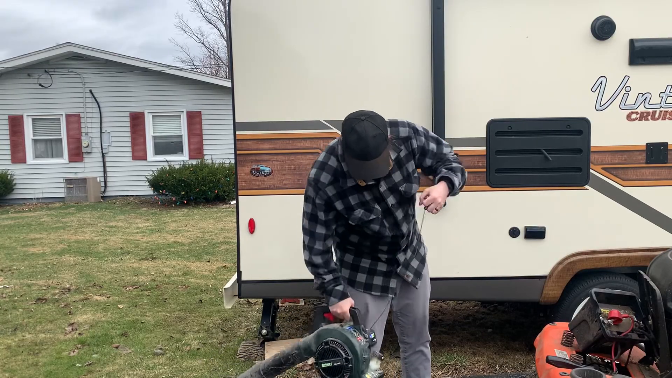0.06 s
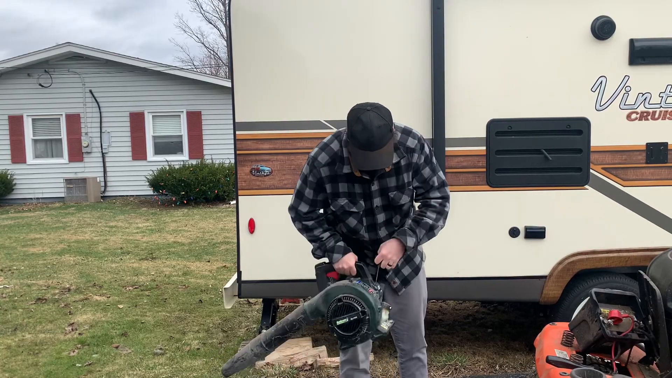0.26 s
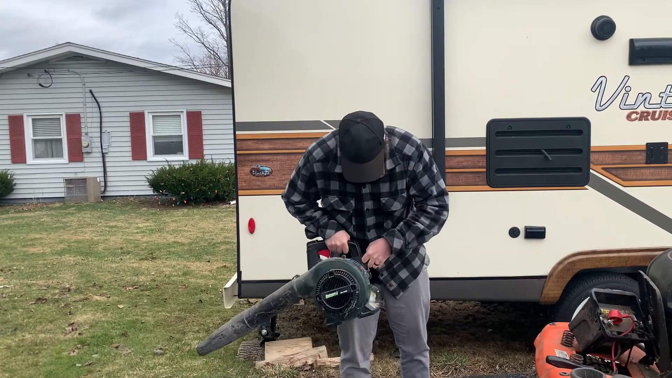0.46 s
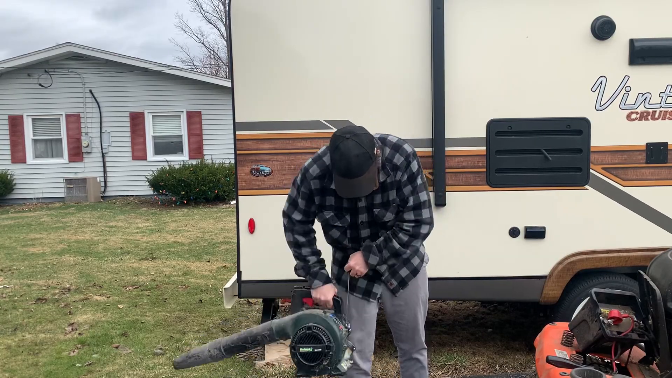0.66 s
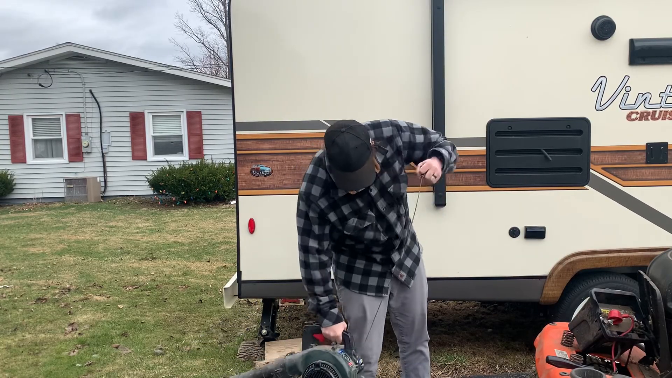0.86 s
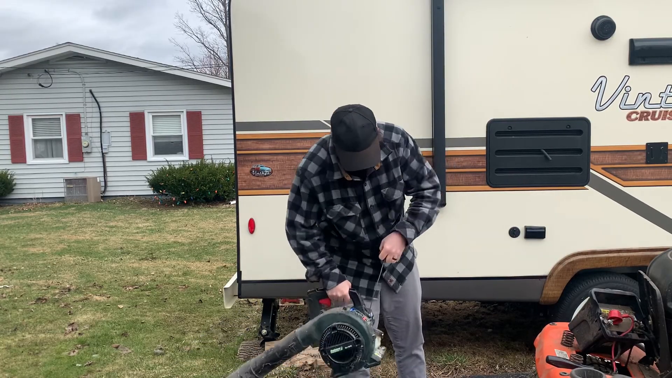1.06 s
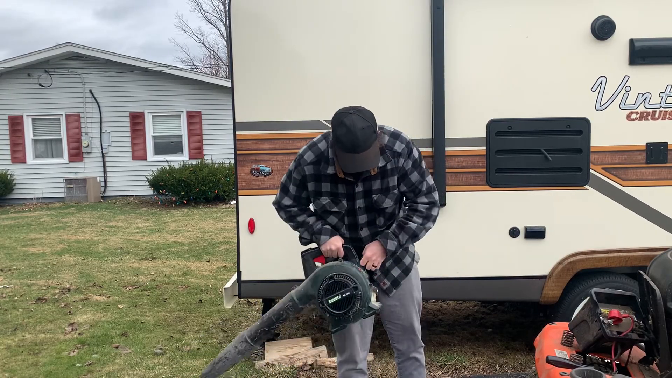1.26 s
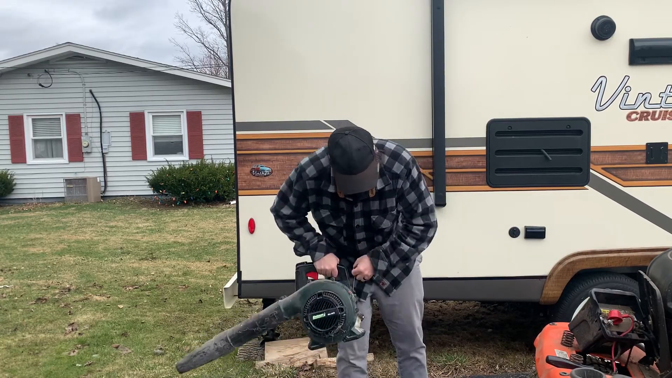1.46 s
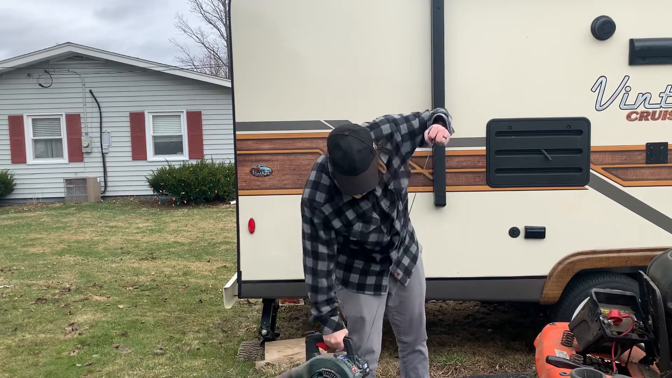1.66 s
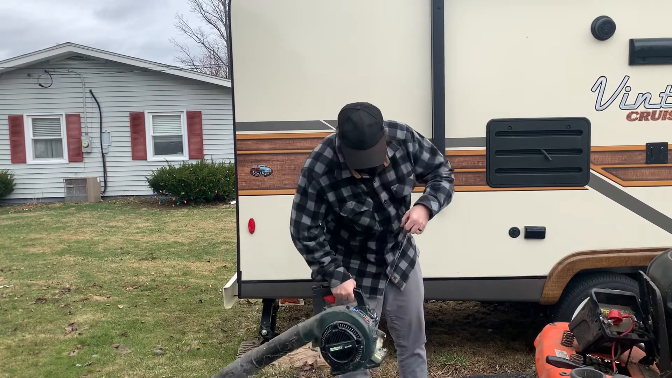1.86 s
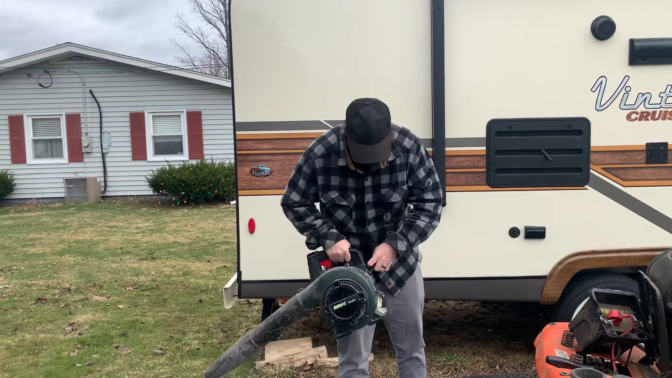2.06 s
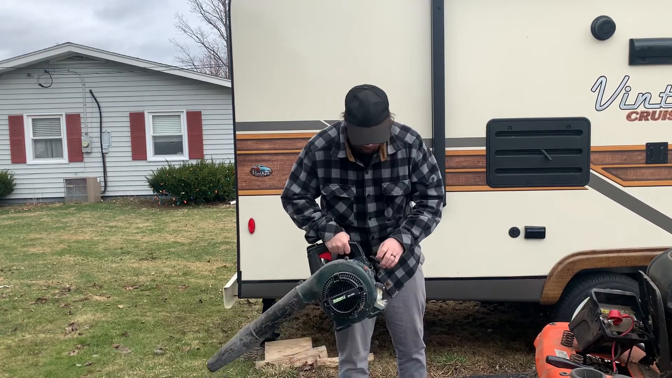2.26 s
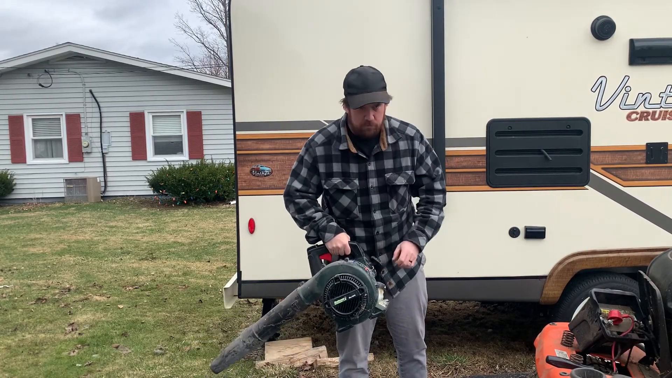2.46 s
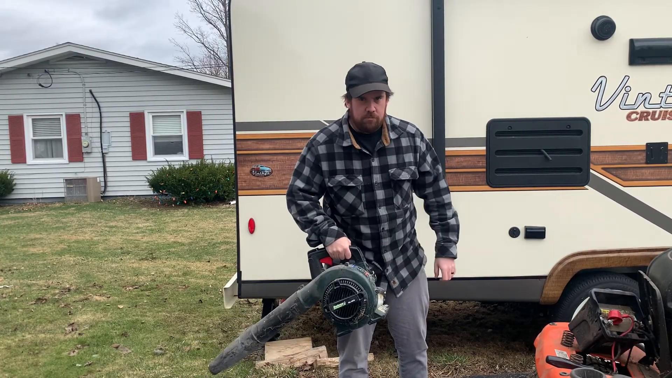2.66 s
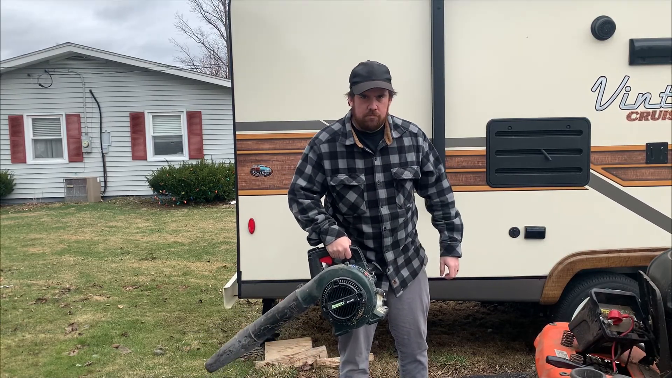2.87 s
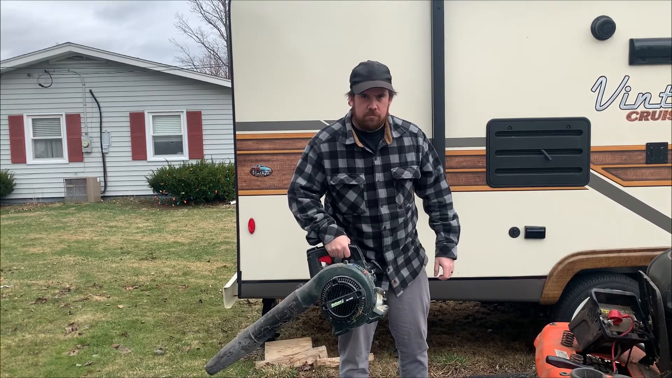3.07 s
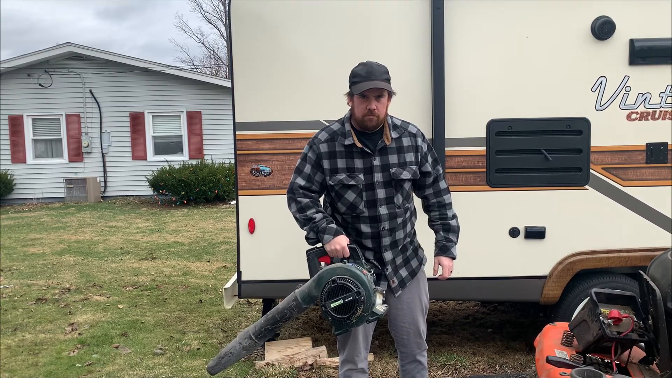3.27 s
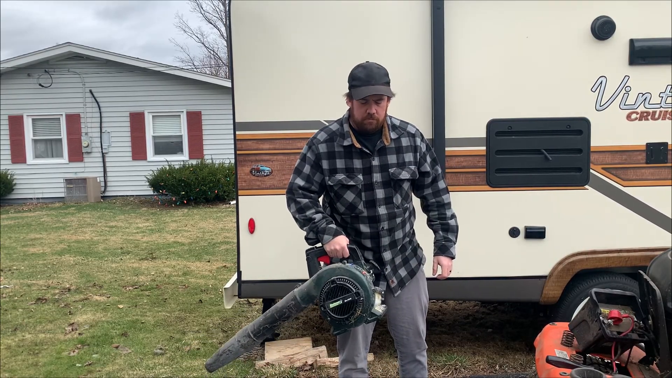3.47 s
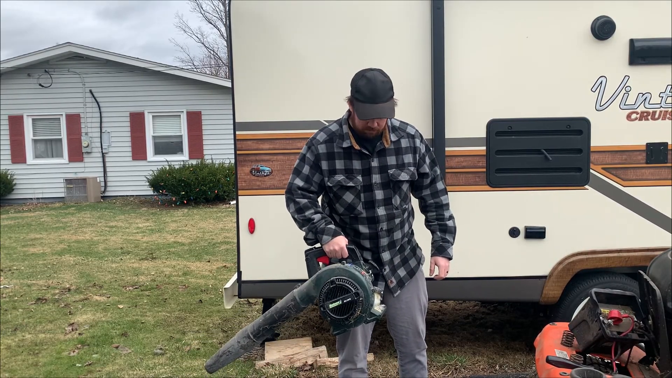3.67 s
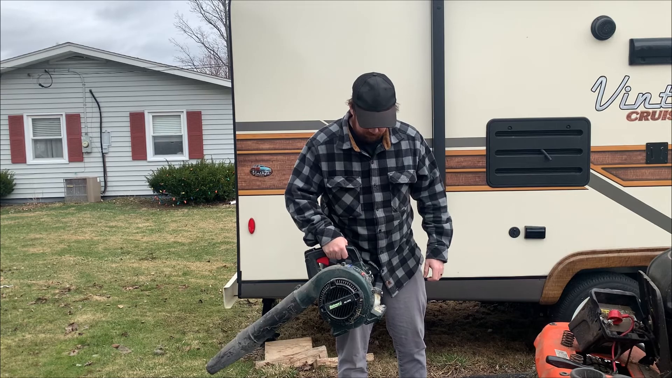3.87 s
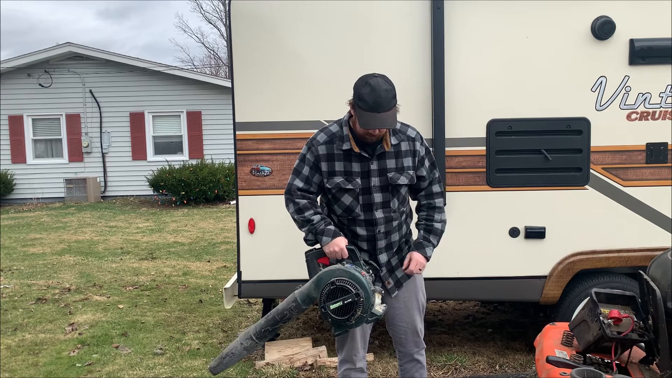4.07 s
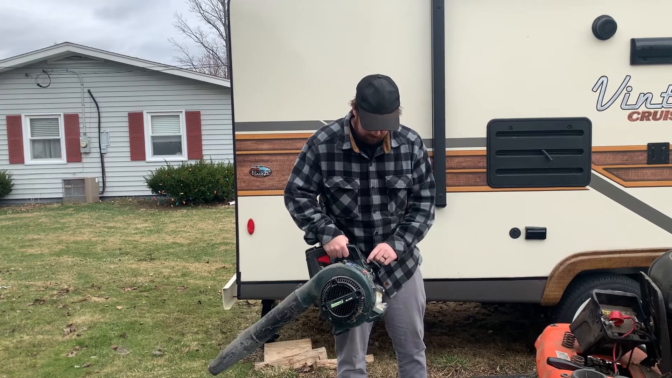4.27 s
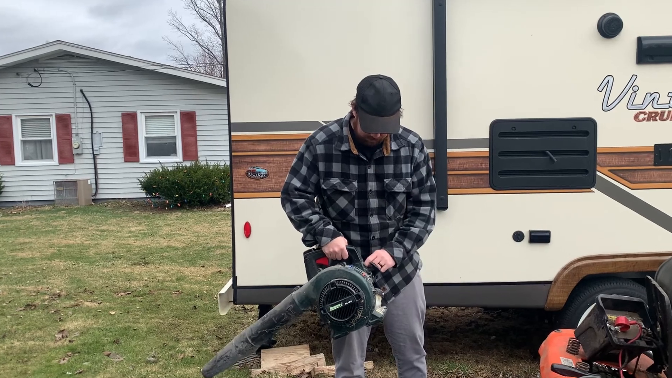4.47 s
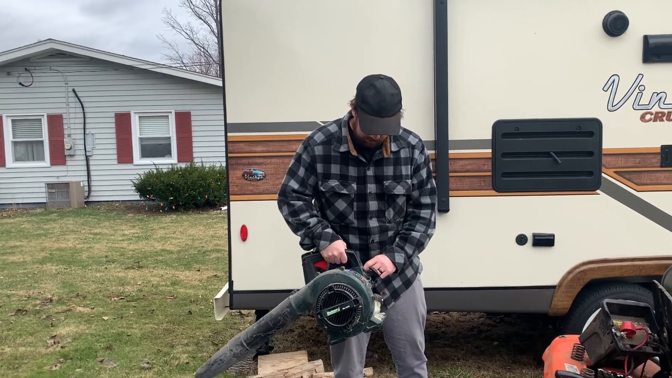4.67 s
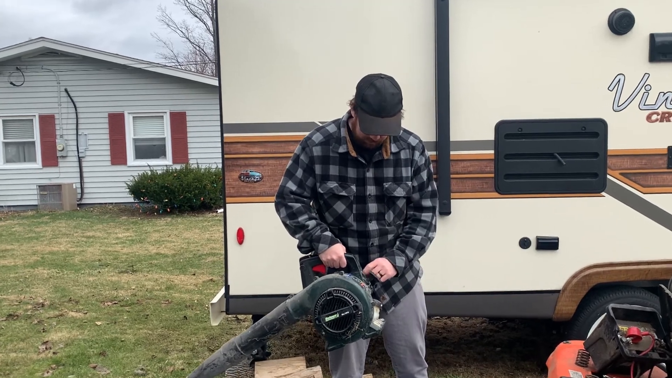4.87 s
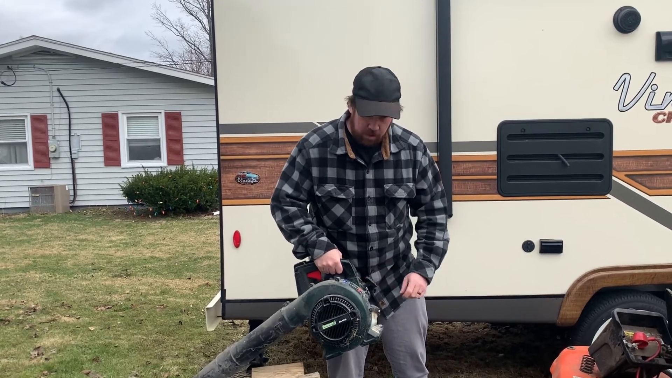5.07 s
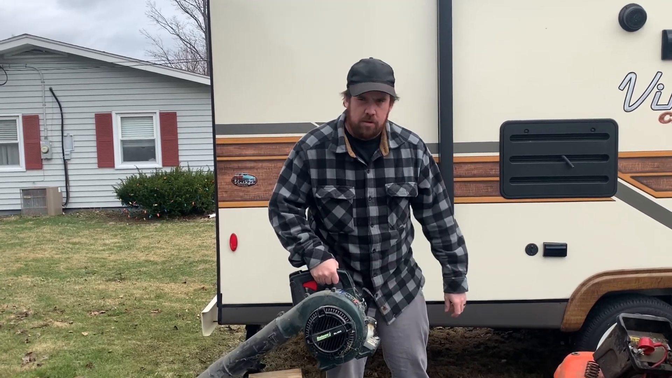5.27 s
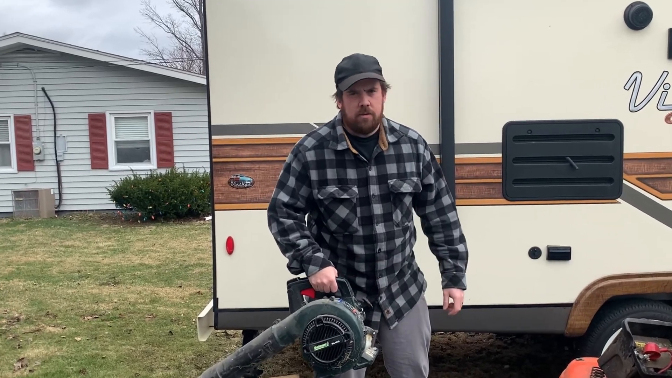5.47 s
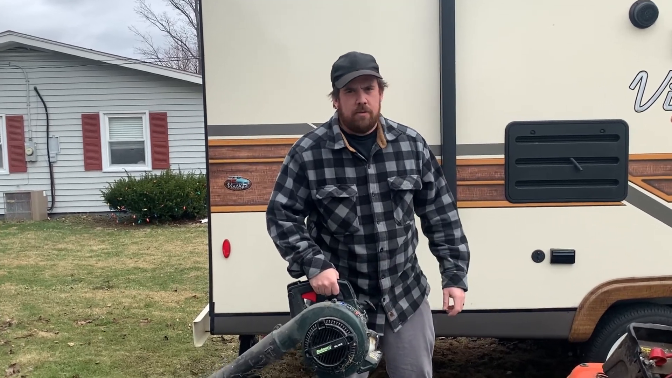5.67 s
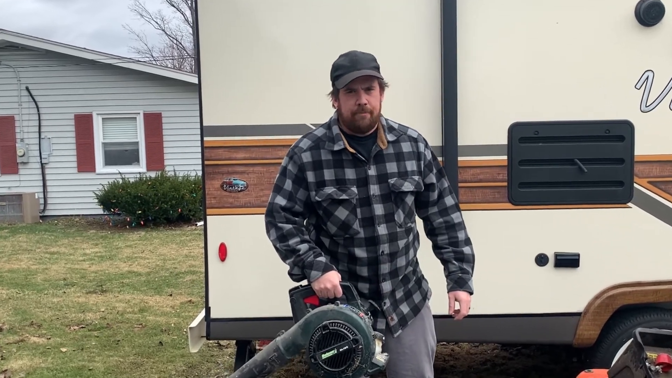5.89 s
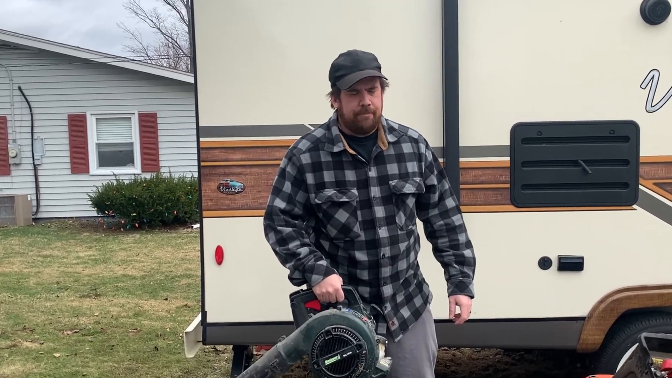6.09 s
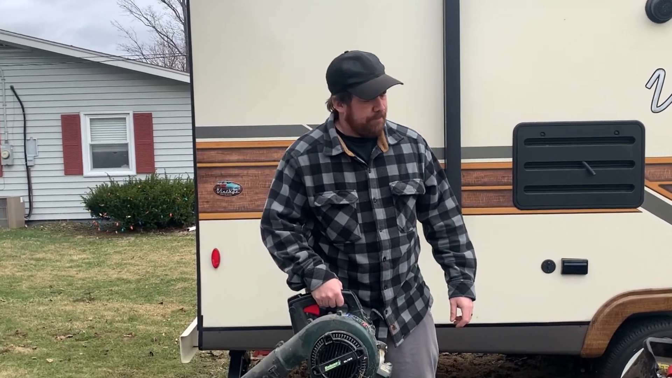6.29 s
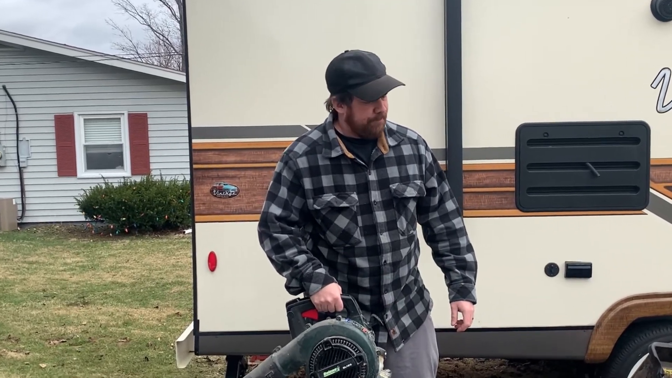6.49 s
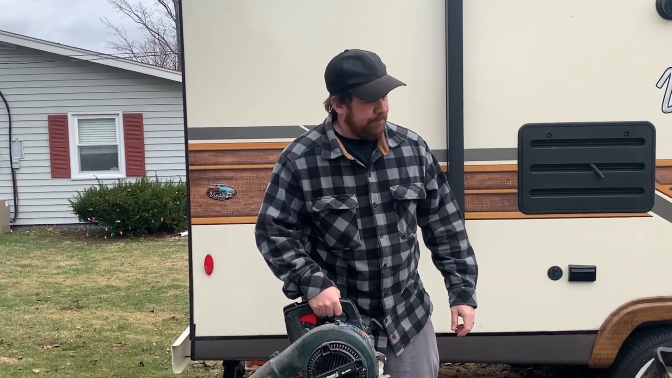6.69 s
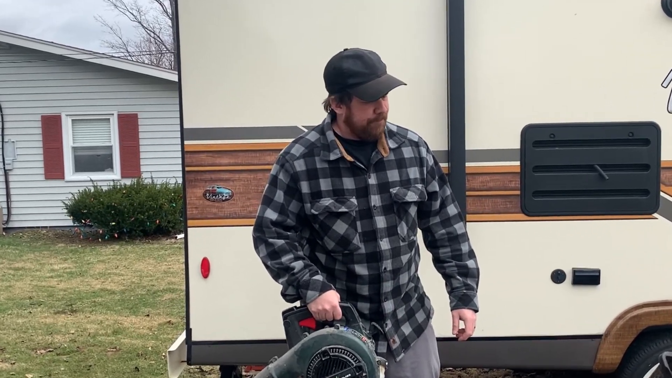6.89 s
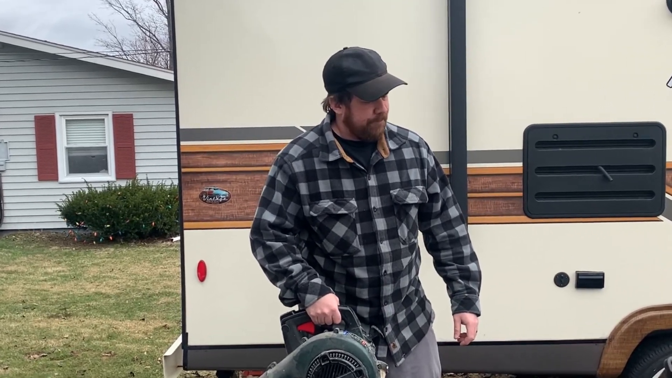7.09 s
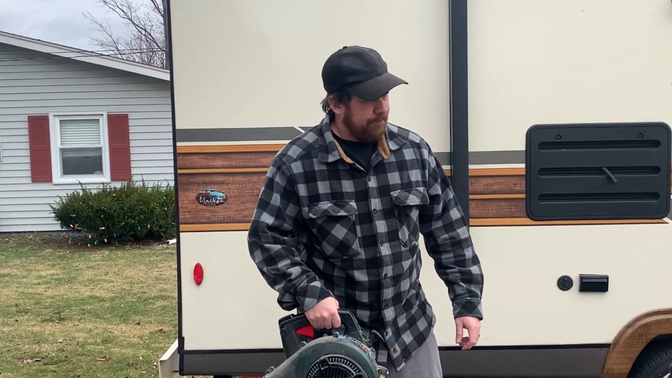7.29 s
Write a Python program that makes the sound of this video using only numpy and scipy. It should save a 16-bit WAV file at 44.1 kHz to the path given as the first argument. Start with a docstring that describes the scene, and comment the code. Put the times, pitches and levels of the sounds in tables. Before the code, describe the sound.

Two short starter-cord pulls clatter and rewind, a third fires a small petrol blower that idles lumpily, nearly stalls, then runs steadily.

```python
"""A hand-held two-stroke leaf blower is pull-started on a lawn beside a camper.
Twice the cord turns the engine over and whirs back onto its reel, with clacks of the starter and handle.
On the third pull the engine catches and idles lumpily, firing only every few turns.
It sags almost to a stall, where loose parts buzz, and then picks up to a steady beat.
Every turn puffs gas into the ringing muffler; filtered noise makes the clatter, rattles and faint yard air."""
import sys
import numpy as np
from scipy import signal
from scipy.fft import rfft, irfft, next_fast_len
from scipy.io import wavfile
from scipy.ndimage import uniform_filter1d, map_coordinates

SR = 44100
rng = np.random.default_rng(int(sys.argv[2]) if len(sys.argv) > 2 else 0)


def bounce(signal):
    """Save signal as a 16-bit WAV file at the path given by the first command-line argument."""
    frames = np.transpose(np.atleast_2d(signal))
    limited = np.clip(frames, -1, 1)
    pcm = np.round(limited * 32767).astype(np.int16)
    wavfile.write(sys.argv[1], SR, pcm)


N = 323694
TIME = np.arange(N) / SR
SIZE = 2 * next_fast_len(N // 2 + SR // 4)  # room for filter tails
FREQ = np.maximum(np.arange(SIZE // 2 + 1) * SR / SIZE, 1)

# average crank speed once the engine runs: (time [s], speed [turns per second])
CRANK_SPEED = [(1.8, 37), (2.9, 38), (3.2, 29), (3.9, 30), (4.3, 24), (4.8, 24), (5.0, 35), (5.238, 44.54),
               (5.7, 53.07), (6.3, 56.19), (6.85, 58.49), (7.3, 55.68)]
# irregular firings of the cold engine: (time [s], strength [dB])
COLD_FIRINGS = [(1.773, -23), (1.822, -46), (1.879, -21.5), (2.001, -21), (2.116, -19), (2.23, -19.5),
                (2.344, -20), (2.439, -21.5), (2.561, -25), (2.688, -24), (2.822, -20.5), (2.954, -22),
                (3.068, -26), (3.16, -37), (3.232, -30), (3.341, -23.5), (3.484, -24), (3.653, -22),
                (3.82, -22), (3.976, -24.5), (4.087, -40), (4.165, -24), (4.284, -23.5), (4.372, -25.5),
                (4.441, -44), (4.532, -24.5), (4.644, -32), (4.766, -31), (4.855, -26), (4.951, -20.5),
                (5.033, -21), (5.14, -21.5)]
# the piston passing compression without firing: (time [s], level [dB])
COMPRESSIONS = [(0.0, -26), (0.033, -23), (0.066, -25), (0.104, -26), (0.146, -27), (0.197, -32),
                (0.267, -31), (0.792, -22.5), (0.83, -23), (0.863, -25), (0.894, -27), (0.928, -22.5),
                (0.966, -26), (1.015, -27), (1.069, -29), (1.155, -28), (1.619, -23), (1.658, -27),
                (1.687, -24), (1.713, -23.5), (1.746, -30)]
# resonances of the cord reel: (frequency [Hz], width [Hz], relative level [dB])
REEL_RESONANCES = [(1360, 220, 4), (2070, 37, 13), (3780, 90, 6), (6160, 620, 0), (10030, 46, 7.5),
                   (12800, 2500, -3)]
# tone colour of rattling parts: (frequency [Hz], relative level [dB])
RATTLE_COLOUR = [(1200, 5), (2500, 4.5), (4000, 1.5), (8000, 4), (10000, 4), (14600, -2), (16000, -9)]

STEADY_DB = -22  # strength of the first firing of the steady beat
CATCH_S = 0.34  # time the muffler takes to fill as the engine catches
ROUNDING_S = 0.0072  # smoothing time that softens the start of a swell


def amp(db):
    """Turn decibels into a gain."""
    return 10 ** (np.asarray(db) / 20)


def unit(x):
    """Scale to an rms of one."""
    return x / np.sqrt(np.mean(np.abs(x) ** 2))


def across(points):
    """Join (Hz, value) points by straight lines over log frequency."""
    hz, value = np.transpose(points)
    return np.interp(np.log(FREQ), np.log(hz), value)


def through(x, response):
    """Filter a sound by a frequency response."""
    return irfft(rfft(x, SIZE) * response, SIZE)[..., :N]


def colour(points):
    """Make a unit-energy filter with the given (Hz, dB) outline that never sounds ahead of its input."""
    cepstrum = irfft(np.log(amp(across(points))))
    return unit(np.exp(rfft(2 * cepstrum[:SIZE // 2], SIZE)))


def modes(rows):
    """Add up resonances into one filter of unit energy."""
    return unit(sum(amp(db) / (1 + 1j * (FREQ ** 2 - hz ** 2) / (FREQ * width))
                    for hz, width, db in rows))


def taps(times, sizes):
    """Place single-sample impulses at the given times."""
    index = np.round(np.asarray(times) * SR).astype(int)
    return np.bincount(np.maximum(index, 0), sizes * np.ones(len(index)), N)[:N]


def bursts(times, sizes, fade_s, rise_s):
    """Make an envelope that swells and dies away after each time."""
    t = TIME[:SR // 4]
    shape = np.exp(-t / fade_s) * (1 - np.exp(-t / rise_s))
    return signal.fftconvolve(taps(times, sizes), shape / shape.max())[:N]


def gate(times, start, end, attack_s, fall_db_s):
    """Make an envelope that is fully up by the start, holds to the end and then decays."""
    return np.clip(1 + (times - start) / attack_s, 0, 1) * amp(-fall_db_s * np.maximum(times - end, 0))


def noise():
    """Make white noise."""
    return rng.standard_normal(N)


def grit():
    """Make noise like dense tiny contacts, its strength changing every 32 samples."""
    strength_db = 3 * np.repeat(rng.standard_normal(N // 32 + 1), 32)[:N]
    return unit(noise() * amp(strength_db))


def drift(rate):
    """Make a smooth random curve of unit rms that takes new values at the given rate in Hz."""
    k = int(SR / rate)
    steps = np.repeat(rng.standard_normal(N // k + 1), k)
    return unit(uniform_filter1d(steps, k)[:N])


def rings(times, sizes, top_hz, end_hz, glide_s, peak_s):
    """After each time a tone swells, glides from its top pitch toward its end pitch and dies away."""
    out, t = np.zeros(N + SR), TIME[:SR // 8]
    for start, size, top, end, peak in np.broadcast(times, sizes, top_hz, end_hz, peak_s):
        phase = np.cumsum(end + (top - end) * np.exp(-t / glide_s)) / SR
        envelope = (t / peak * np.exp(1 - t / peak)) ** 2
        i = int(np.clip(start * SR, 0, N))
        out[i:i + len(t)] += size * np.sin(2 * np.pi * phase) * envelope
    return out[:N]


def knocks(times, sizes, pitches, rows, scatter_db, fade_s, rise_s):
    """Each short gritty blow rings its own mix of the resonances, scaled by its pitch."""
    out, t = np.zeros(N + SR), TIME[:SR // 10]
    freq = np.maximum(np.fft.rfftfreq(len(t), 1 / SR), 1)
    shape = np.exp(-t / fade_s) * (1 - np.exp(-t / rise_s))
    shape = shape / shape.max()
    for start, size, pitch in np.broadcast(times, sizes, pitches):
        ring = 0
        for hz, width, db in rows:
            level = amp(db + scatter_db * rng.standard_normal())
            ring = ring + level / (1 + 1j * (freq ** 2 - (hz * pitch) ** 2) / (freq * width))
        blow = rng.standard_normal(len(t)) * shape
        i = int(np.clip(start * SR, 0, N))
        out[i:i + len(t)] += size * irfft(rfft(blow) * unit(ring), len(t))
    return out[:N]


def speed(times):
    """Give the crank turns per second at the given times."""
    return np.interp(times, *np.transpose(CRANK_SPEED))


def opened(times):
    """Give the share of full flow through the muffler: none at a slow idle, all at full speed."""
    idle, full = CRANK_SPEED[1][1], CRANK_SPEED[-1][1]
    return np.clip((speed(times) - idle) / (full - idle), 0, 1)


def firings():
    """Time and strength of every firing: irregular while cold, then on every third or fourth turn."""
    # the steady beat: (number of firings [count], turns leading up to each [turns], strength [dB])
    beat_pattern = [(24, 4, -18.5), (1, 3, -18.5), (1, 4, -23), (2, 3, -18.5), (1, 4, -23)]
    steady_from_s = 5.238
    cold_s, cold_db = np.transpose(COLD_FIRINGS)
    turns = np.cumsum(speed(TIME)) / SR
    repeats, apart, beat_db = np.transpose(beat_pattern)
    repeats = repeats.astype(int)
    due = np.interp(steady_from_s, TIME, turns) + np.append(0, np.cumsum(np.repeat(apart, repeats)))
    times = np.append(cold_s, np.interp(due, turns, TIME))
    return times, np.concatenate([cold_db, [STEADY_DB], np.repeat(beat_db, repeats)])


def crank():
    """Time and length of every turn; between two firings the crank coasts through whole turns."""
    coast_sag = 0.063  # the crank is about this share faster after a firing, and slower before the next
    unfired, fired = np.transpose(COMPRESSIONS)[0], firings()[0]
    unfired_length = np.clip(np.diff(unfired, append=fired[0]), 0.03, 0.065)
    rows = list(zip(unfired, unfired_length))
    gaps = np.append(np.diff(fired), fired[-1] - fired[-2])
    for start, gap in zip(fired, gaps):
        n = round(gap * speed(start + gap / 2))
        rows += [(start + gap * u * (1 - coast_sag * (1 - u)), gap / n) for u in np.arange(n) / n]
    return np.transpose(rows)


def effort(times):
    """Gains of muffler and clatter: up as the engine turns over, down as it stops, held once it runs."""
    # the engine turning over before it runs, under the cord or coasting:
    # (first compression [s], last compression [s], muffler level [dB])
    turning_over = [(0.002, 0.176, -27.5), (0.184, 0.29, -38), (0.77, 1.008, -28.5), (1.582, 1.76, -28)]
    spin_up_s, muffler_fall_db_s, clatter_fall_db_s = 0.1, 26, 92
    muffler_slope_db, clatter_slope_db = 7, -0.5  # gained per tenfold speed
    surge_db, settle_s = 17, 0.15  # the muffler overshoots as the engine catches, then settles
    since = np.maximum(times - COLD_FIRINGS[0][0], 0)
    running = np.clip(since / CATCH_S, 0, 1) ** 1.4
    pace = np.log10(speed(times) / CRANK_SPEED[0][1])
    muffler = running * amp(-20.5 + muffler_slope_db * pace + surge_db * np.exp(-since / settle_s))
    clatter = (since > 0) * amp(-37.5 + clatter_slope_db * pace)
    for first, last, db in turning_over:
        early_muffler = amp(db) * gate(times, first, last, spin_up_s, muffler_fall_db_s)
        early_clatter = amp(-36) * gate(times, first, last, spin_up_s, clatter_fall_db_s)
        muffler = np.maximum(muffler, early_muffler)
        clatter = np.maximum(clatter, early_clatter)
    return muffler, clatter


def drone(times, period, hz, glide, wander):
    """Each turn pushes the muffler's main resonance twice; each firing restarts it a little higher."""
    early_sharp = 0.09  # share by which it rings higher before the engine catches
    afterglow, afterglow_delay_s = 0.18, 0.019  # burnt gas swells the ring after a firing
    restart_s = 0.0018  # a firing briefly breaks off the ring
    open_db = -4  # near full speed this ring gives way to the muffler's other modes
    chance = rng.standard_normal((len(times), 2)).T
    fired, strength_db = firings()
    first_push = bursts(times - .002, amp(1.3 * chance[0]), fade_s=0.008, rise_s=0.004)
    second_push = bursts(times + period / 2 - .002, amp(-2.5 + 2 * chance[1]), fade_s=0.002, rise_s=0.0015)
    heat = bursts(fired, 1.0, fade_s=0.028, rise_s=0.003)
    sharp = early_sharp * np.exp(-np.maximum(TIME - fired[0], 0) / CATCH_S)
    phase = np.cumsum(hz * (1 + sharp + glide * heat + wander * drift(110))) / SR
    # count the phase from the latest restart, and dip the level around each one
    restarts = np.append(0, fired - 0.0003)
    last = restarts[np.searchsorted(restarts, TIME, side="right") - 1]
    nearest = np.interp(TIME, restarts, np.arange(len(restarts))).round().astype(int)
    unbroken = 1 - np.exp(-((TIME - restarts[nearest]) / restart_s) ** 2)
    tone = np.sin(2 * np.pi * (phase - np.interp(last, TIME, phase)))
    glow_size = afterglow * amp(strength_db - STEADY_DB)
    burnt = bursts(fired + afterglow_delay_s, glow_size, fade_s=0.018, rise_s=0.02)
    swell = uniform_filter1d(first_push + second_push, int(ROUNDING_S * SR))
    ringing = (0.12 + burnt + swell) * amp(drift(22))
    return effort(TIME)[0] * amp(2.5 + open_db * opened(TIME)) * ringing * unbroken * tone


def pumping(times, period):
    """Each turn, fired or not, puffs gas through the muffler's resonances."""
    # other muffler resonances: (frequency [Hz], width [Hz], relative level [dB])
    muffler_modes = [(298.6, 20, 17), (424.7, 24, 19.5), (470, 7.4, -1), (551, 12.6, 10.5)]
    chance = rng.standard_normal(size=(len(times), 2)).T
    gain = effort(times)[0] * amp(6.5 * opened(times))  # puffs grow toward full speed
    puff_size = gain * np.sqrt(period * SR) * amp(-12.5 + 1.5 * chance[1])
    puffs = taps(times + .0002 * chance[0], puff_size)
    gas = noise() * bursts(times - .002, gain * amp(-13), fade_s=.009, rise_s=.003)
    soft = 1 / (1 + (FREQ / 900) ** 4)  # a port opens gradually, so its pulse is round
    low_cut = 1 / (1 + (230 / FREQ) ** 4)
    return through(puffs + gas, amp(-0.5) * modes(muffler_modes) * soft * low_cut)


def rocking(times):
    """The running machine rocks on its crank with tones at multiples of the turn rate, more at speed."""
    # rocking at the final speed: (multiple of the crank rate [times], level [dB])
    rocking_orders = [(1, -37.5), (2, -38), (3, -46)]
    turn = 2 * np.pi * np.interp(TIME, times, np.arange(len(times)))
    strength = (np.interp(TIME, *np.transpose(CRANK_SPEED), left=0) / CRANK_SPEED[-1][1]) ** 2
    return strength * sum(amp(db) * np.sin(round(k) * turn) for k, db in rocking_orders)


def firing_levels(level_db, slope_db):
    """Level of one part of every firing: its strength, a slope per tenfold speed, and some chance."""
    full_speed = 52.7  # turns per second from which the slope no longer acts
    times, strength_db = firings()
    pace = np.log10(np.minimum(speed(times) / full_speed, 1))
    return strength_db + level_db + slope_db * pace + 2 * rng.standard_normal(len(times))


def bark():
    """Each firing sends a pulse through the exhaust, with a pipe echo, and a low thump that falls in pitch."""
    # exhaust resonances: (frequency [Hz], width [Hz], relative level [dB])
    bark_modes = [(471, 560, 3), (942, 23, 6.5)]
    times = firings()[0]
    bark_db = firing_levels(1, 57)
    pipe_echo = 1 + 0.59 * np.exp(-2j * np.pi * FREQ * 0.00203)
    pulses = taps(times + 0.001035, amp(bark_db + 19.5))
    exhaust = through(pulses, modes(bark_modes) * pipe_echo / (1 + 1j * FREQ / 1200))
    thump_size = amp(0.15 * bark_db - 24.5 - 2 * opened(times))
    return exhaust + rings(times, thump_size, top_hz=139, end_hz=62, glide_s=0.017, peak_s=0.016)


def crack():
    """Each firing cracks in the cylinder: a click and a noise burst through two resonances."""
    # crack resonances: (frequency [Hz], width [Hz], relative level [dB])
    crack_modes = [(1826, 37, 2), (2090, 55, 5)]
    times = firings()[0]
    crack_db = firing_levels(-8.5, -14)
    click = taps(times + .0015, amp(crack_db + 18))
    hiss = noise() * bursts(times, amp(crack_db - 1), fade_s=.0035, rise_s=.001)
    return through(click + hiss, unit(modes(crack_modes) / (1 + (FREQ / 2500) ** 8)))


def housing():
    """Each firing shakes the housing into a gritty rattle, and its thin steel sings along."""
    # steel resonances: (frequency [Hz], width [Hz], relative level [dB])
    steel_modes = [(5020, 50, 0), (4230, 160, -9)]
    rattle_db = firing_levels(-22, 3.3)
    shake = bursts(firings()[0] - .003, amp(rattle_db + 7.5), fade_s=0.015, rise_s=0.0033)
    rattle = colour(RATTLE_COLOUR) / (1 + (3500 / FREQ) ** 4)
    return through(grit() * shake, rattle + amp(-12.0) * modes(steel_modes))


def kicks():
    """Each firing shoves a short, round slug of gas out of the muffler, shorter and harder at speed."""
    times, strength_db = firings()
    flow = opened(times)
    peak_s = np.interp(flow, [0, 1], [0.004, 0.0022])
    return rings(times, amp(strength_db - 8 + 10 * flow), 480, 345 + 50 * flow, 0.0025, peak_s)


def catching(times, peak_s, length_s, db):
    """The first rich charges rasp out turn by turn; each cold firing coughs, less as the engine warms."""
    # cough resonances: (frequency [Hz], width [Hz], relative level [dB])
    cough_modes = [(537, 67, 3.5), (764, 33, -0.5), (883, 37, -10)]
    warming_db_s = 3  # how fast the coughs fade
    puff_size = amp(db) * np.exp(-((times - peak_s) / length_s) ** 2)
    puffs = bursts(times - .003, puff_size, fade_s=0.021, rise_s=0.002)
    rasp = through(grit() * puffs, modes([(598, 63, 12.0), (764, 77, 8.5), (1386, 36, 12.3)]))
    fired, strength_db = np.transpose(COLD_FIRINGS)
    cough_db = strength_db - 2 - warming_db_s * (fired - fired[0])
    coughs = bursts(fired, amp(cough_db), fade_s=0.013, rise_s=0.00091)
    return rasp + through(grit() * coughs, modes(cough_modes) / (1 + (FREQ / 1800) ** 4))


def whoops(period):
    """Each gulp through the shut choke rings the crankcase, falling in pitch, further on slow turns."""
    top_hz, glide_s = 264, 0.014
    times, db = np.transpose(COMPRESSIONS)
    slow = period[:len(times)] / 0.028  # turn length against a reference turn [s]
    end_hz, length_s = 104 / slow ** 0.71, 0.0094 * slow ** 0.3
    octave = rings(times, amp(db - 9.5), 2 * top_hz, 2 * end_hz, glide_s, 0.89 * length_s)
    return rings(times, amp(db), top_hz, end_hz, glide_s, length_s) + octave


def gulps(times):
    """The running engine draws a short falling gulp on every turn, hardest while the charge is rich."""
    rich_db, rich_s = 6.5, 0.079  # extra draw of the first charges, and how long it takes to fade
    times = times[len(COMPRESSIONS):]
    chance = rng.standard_normal((len(times), 2)).T * (1 - .8 * opened(times))  # turns grow alike at speed
    db = -32.5 + rich_db * np.exp((times[0] - times) / rich_s) + 3.2 * chance[0]
    end_hz = 128 * (1 + 0.05 * chance[1])
    return rings(times - 0.002, amp(db), top_hz=212.4, end_hz=end_hz, glide_s=0.012, peak_s=0.012)


def machinery(times):
    """Piston and fan clatter in the casing, hardest as each turn passes compression."""
    # tone colour of the clatter: (frequency [Hz], relative level [dB])
    clatter_colour = [(250, 6), (560, 3), (1150, 0.5), (2200, -1), (2700, -14), (4800, -11.5), (5600, -19),
                      (9500, -14.5), (15000, -27)]
    # casing resonances: (frequency [Hz], width [Hz], relative level [dB])
    casing_modes = [(1378.6, 23, 9), (1536, 32, 7.6), (1746, 68, 2.8), (1938, 100, 10.4), (2110, 33, 4)]
    chance = rng.standard_normal(size=(len(times), 2)).T
    beat = bursts(times - .005, amp(2.2 * chance[0]), fade_s=0.011, rise_s=0.014)
    gain = effort(TIME)[1]
    clatter = through(grit() * gain * (0.52 + 0.45 * beat), amp(2.0) * colour(clatter_colour))
    casing = through(grit() * gain * (0.28 + .5 * beat), amp(3.5) * modes(casing_modes))
    tick_size = effort(times)[1] * amp(-3.5 + 6.3 * chance[1])
    ticks = bursts(times - .002, tick_size, fade_s=0.00047, rise_s=0.0021)
    return clatter + casing + through(grit() * ticks, colour(RATTLE_COLOUR))


def slaps(times):
    """The piston slaps the cylinder each turn, more on a slow crank, and now and then much harder."""
    # the hardest slaps of the cold piston: (time [s], level [dB])
    hard_slaps = [(2.46, -34.5), (2.586, -39), (2.979, -36), (3.036, -38), (3.096, -37.5), (3.876, -34.5)]
    # cylinder resonances: (frequency [Hz], width [Hz], relative level [dB])
    cylinder_modes = [(2940, 300, 2.5), (3570, 200, 4.5), (4310, 380, -2.5)]
    hard_s, hard_db = np.transpose(hard_slaps)
    slowness = CRANK_SPEED[-1][1] / speed(times)
    usual = effort(times)[1] * slowness * amp(-9.0 + 2 * rng.standard_normal(len(times)))
    starts = np.append(times - .003, hard_s)
    sizes = np.append(usual, amp(hard_db))
    pitch = 1 + .03 * rng.standard_normal(len(starts))
    return knocks(starts, sizes, pitch, cylinder_modes, scatter_db=3.5, fade_s=0.01, rise_s=0.0026)


def buzzes():
    """Loose parts swell into a short buzz when the engine shudders near a stall."""
    # buzzes: (time [s], level [dB])
    buzz_moments = [(4.272, -34.5), (4.319, -34.5), (4.361, -32.5), (4.52, -33.5), (4.638, -36),
                    (4.688, -32), (4.842, -30)]
    times, db = np.transpose(buzz_moments)
    swell = bursts(times, amp(db), fade_s=0.0077, rise_s=0.0075)
    swell = uniform_filter1d(swell, int(ROUNDING_S * SR))
    return through(grit() * swell, colour(RATTLE_COLOUR) + amp(-7) * modes(REEL_RESONANCES[-2:]))


def starter():
    """A spring reels the cord in: pawls chatter over the ratchet and the reel's ring wavers."""
    # cord running back: (start [s], length [s], level at the start [dB], level at the end [dB])
    cord_rewinds = [(0.181, 0.11, -37.5, -33), (1.049, 0.15, -34, -38)]
    chatter_hz = 230  # average rate of pawls skipping over the ratchet
    whir = 0
    for start, length, first_db, last_db in cord_rewinds:
        level = amp(np.interp(TIME, [start, start + length], [first_db, last_db]))
        whir = whir + level * gate(TIME, start, start + length, attack_s=0.0066, fall_db_s=479)
    tooth = np.cumsum(chatter_hz * (1 + .25 * drift(90))) / SR % 1  # place between two teeth, 0 to 1
    chatter = whir * unit(.4 + np.exp(-tooth / .3))
    ring = through(grit() * chatter, amp(5.0) * modes(REEL_RESONANCES))
    # reading the ring a little faster and slower makes its pitch waver
    read_at = np.cumsum(1 + .012 * drift(45) * (whir > .001))
    wavering = map_coordinates(ring, [read_at], mode="nearest")
    return wavering + through(grit() * chatter, colour(RATTLE_COLOUR))


def clacks():
    """Starter pawls and handle knock on the cover; each blow rings it at its own pitch."""
    # clacks: (time [s], body level [dB], bright edge level [dB], ring pitch [Hz])
    clack_events = [(0.064, -24, -31, 2050), (0.138, -37, -22.5, 2040), (0.205, -16, -49, 2050),
                    (0.347, -21.5, -52, 2170), (0.367, -30, -35, 1350), (0.416, -23.5, -49, 1240),
                    (0.455, -25, -57, 2030), (0.505, -33, -33, 1980), (0.549, -28, -35.5, 1980),
                    (0.636, -30.5, -75, 2140), (1.006, -28, -32.5, 2060), (1.122, -18, -48, 2080),
                    (1.178, -21.5, -33, 1990), (1.244, -21, -61, 2100), (1.293, -23.5, -64, 1780),
                    (1.357, -33.5, -64, 1900), (1.428, -36, -80, 1380), (1.478, -26.5, -33, 2000),
                    (1.527, -22, -29.5, 1780), (3.479, -20, -26, 1980), (4.763, -45, -34, 2050)]
    # cover resonances: (multiple of the ring pitch [times], width [Hz], relative level [dB])
    cover_modes = [(0.64, 130, 2.5), (1, 100, 13), (1.8, 250, -30)]
    # tone colour of the body: (frequency [Hz], relative level [dB])
    clack_colour = [(200, -8), (500, -2), (1300, 1), (2050, 5), (2700, -5), (3700, -8), (5000, -16),
                    (12000, -45)]
    times, body_db, edge_db, ring_hz = np.transpose(clack_events)
    ring = knocks(times, amp(body_db - 12), ring_hz, cover_modes, scatter_db=3, fade_s=0.0084, rise_s=.002)
    body = grit() * bursts(times, amp(body_db - 11.5), fade_s=0.011, rise_s=0.0014)
    edge = grit() * bursts(times, amp(edge_db - 8.0), fade_s=0.013, rise_s=0.0013)
    bright = colour(RATTLE_COLOUR) + amp(0.5) * modes(REEL_RESONANCES)
    return ring + through(body, colour(clack_colour)) + through(edge, bright)


def cord():
    """Cord fibres rasp over the guide, falling in pitch as the free length of cord grows."""
    # cord zips: (start [s], length [s], first pitch [Hz], last pitch [Hz], level [dB])
    cord_zips = [(0.405, 0.036, 2380, 1123, -36.5), (0.706, 0.098, 2870, 1055, -36),
                 (1.526, 0.057, 2350, 1200, -37)]
    out = 0
    for start, length, first_hz, last_hz, db in cord_zips:
        along = np.clip((TIME - start) / length, 0, 1)
        phase = 2 * np.pi * np.cumsum(first_hz + (last_hz - first_hz) * along) / SR
        rasp = drift(2400) * np.sin(phase) + drift(1000) * np.sin(phase / 2) / 2
        out = out + amp(db) * np.sqrt(np.abs(np.sin(np.pi * along))) * rasp
    return out


def yard_air():
    """The faint air of the yard is steady noise, strongest in the bass."""
    # tone colour of the air: (frequency [Hz], relative level [dB])
    yard_colour = [(30, -3.5), (100, -6), (2500, -28.5), (16000, -56)]
    return amp(-47.0) * through(noise(), colour(yard_colour))


def outdoors(x):
    """Sound reaches the left first; a brief scatter off lawn and camper has opposite signs left and right."""
    # scatter: (frequency [Hz], relative level [dB])
    scatter_colour = [(100, -19.5), (350, -10.5), (700, 5.5), (1500, 2.5), (4500, 10.5), (9000, 9)]
    lag_s = 0.000038  # left-to-right delay in the bass, shrinking in the treble
    sides = np.array([[1], [-1]])
    direct = np.exp(1j * np.pi * sides * FREQ * lag_s / (1 + (FREQ / 9000) ** 2))
    tail = noise() * np.exp(-TIME / 0.012) * (TIME > .002)
    scatter = unit(rfft(tail, SIZE)) * amp(across(scatter_colour) - 11.0)
    return through(x, direct * (1 + sides * scatter))


def scene():
    """Add up the blower and the yard air, and place them outdoors in stereo."""
    times, period = crank()
    exhaust = drone(times, period, hz=339.74, glide=0.075, wander=0.027) + pumping(times, period)
    firing = bark() + crack() + housing() + kicks()
    firing = firing + catching(times, peak_s=1.8, length_s=0.28, db=-34)
    intake = whoops(period) + gulps(times)
    mechanics = rocking(times) + machinery(times) + slaps(times) + buzzes()
    starting_gear = starter() + clacks() + cord()
    return outdoors(exhaust + firing + intake + mechanics + starting_gear + yard_air())


def record(dry):
    """The microphone sheds rumble and weakens a narrow treble band; the very top is cut."""
    notch = amp(-20 * np.exp(-((FREQ - 11600) / 620) ** 2))
    rumble_cut = signal.butter(6, 40, "highpass", fs=SR, output="sos")
    top_cut = signal.ellip(8, .2, 70, 15900, fs=SR, output="sos")
    lean = signal.sosfilt(rumble_cut, through(dry, notch))
    return signal.sosfilt(top_cut, lean)


dry = scene()
out = record(dry)
bounce(out)
```